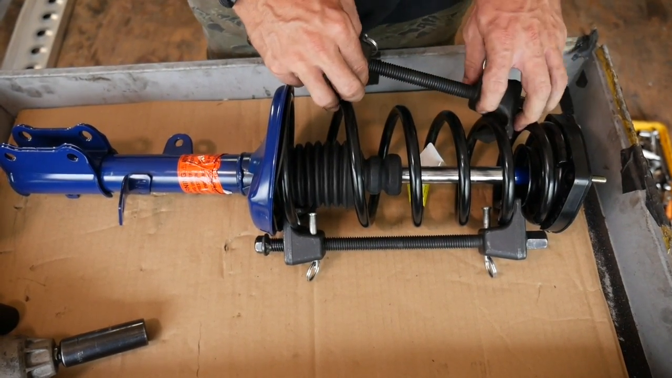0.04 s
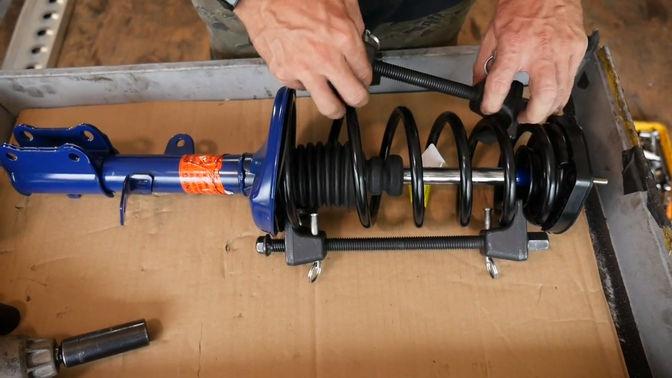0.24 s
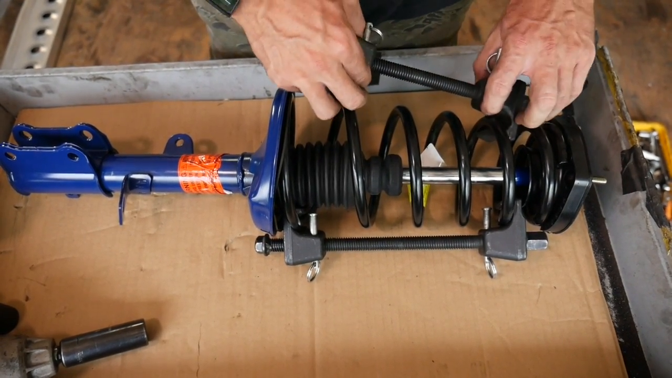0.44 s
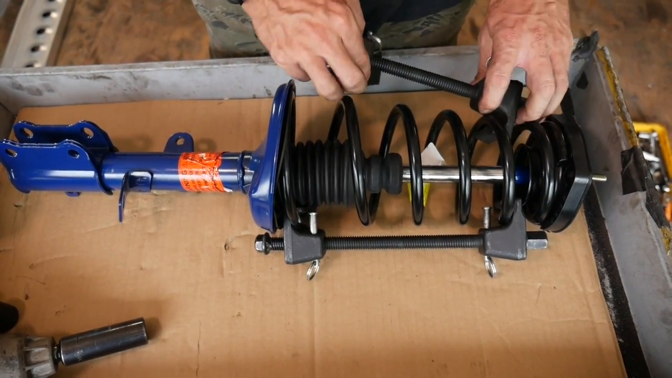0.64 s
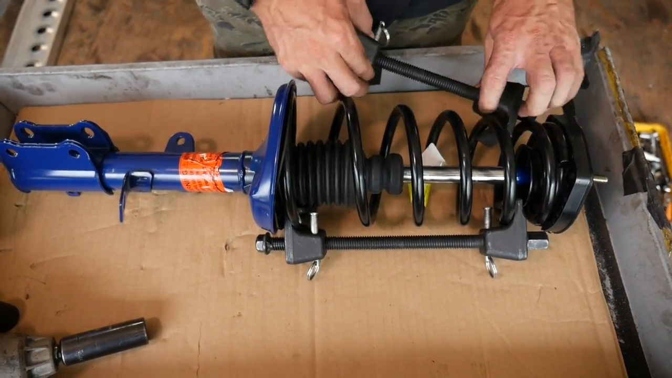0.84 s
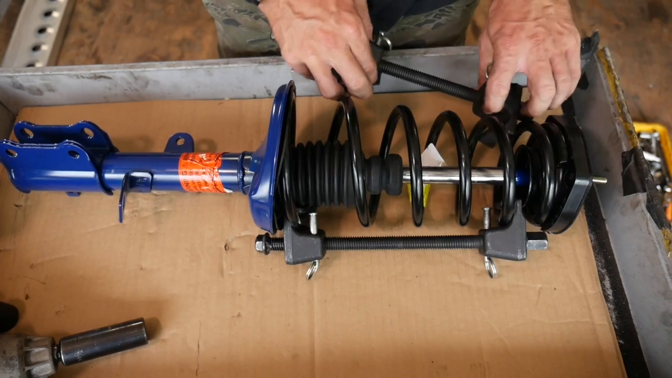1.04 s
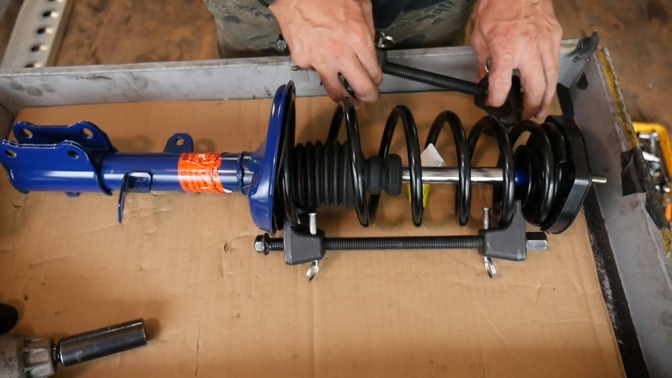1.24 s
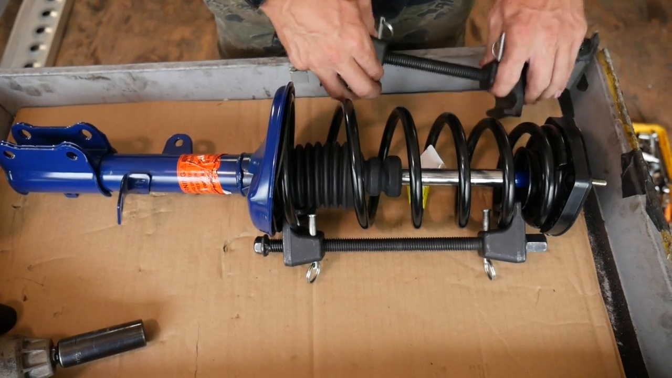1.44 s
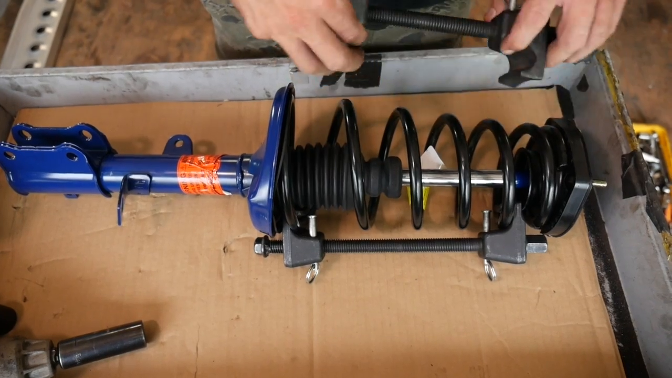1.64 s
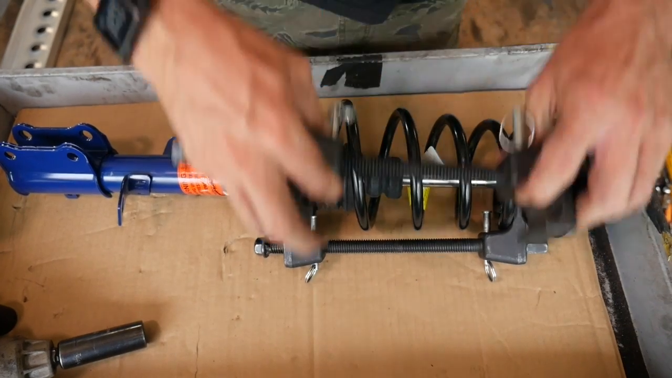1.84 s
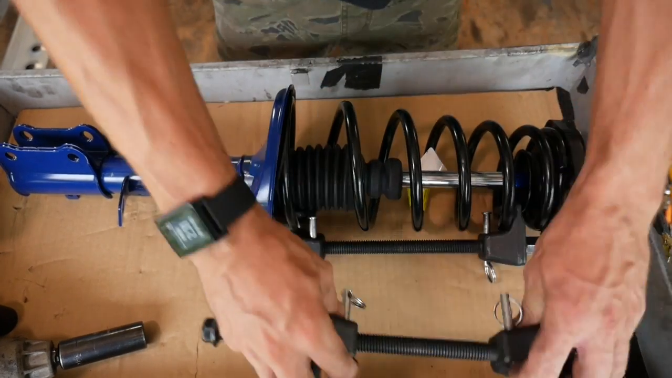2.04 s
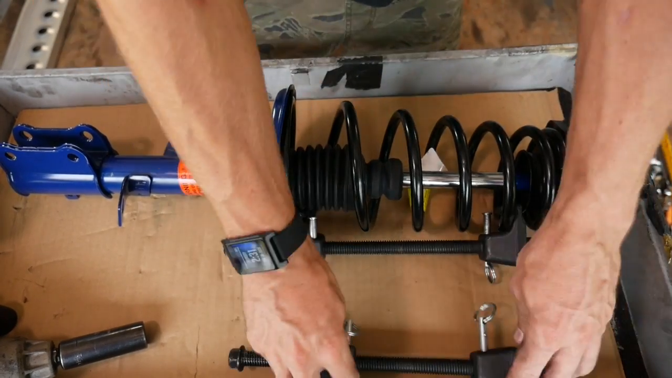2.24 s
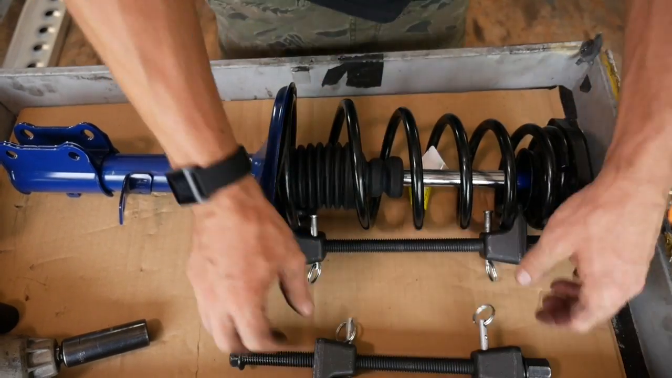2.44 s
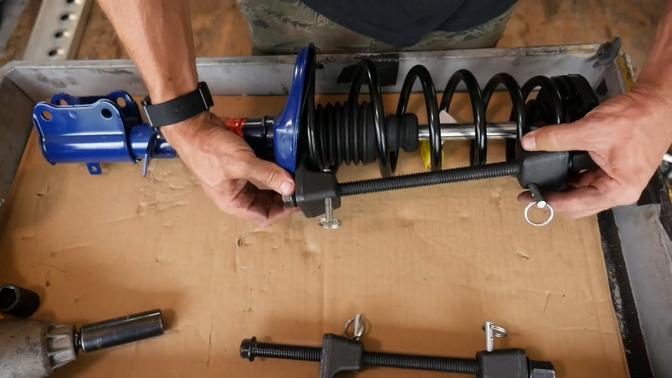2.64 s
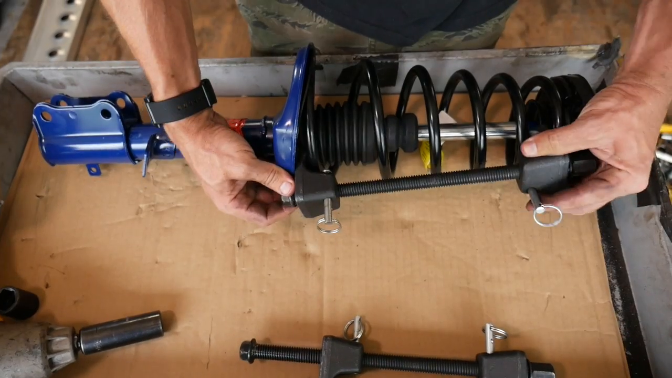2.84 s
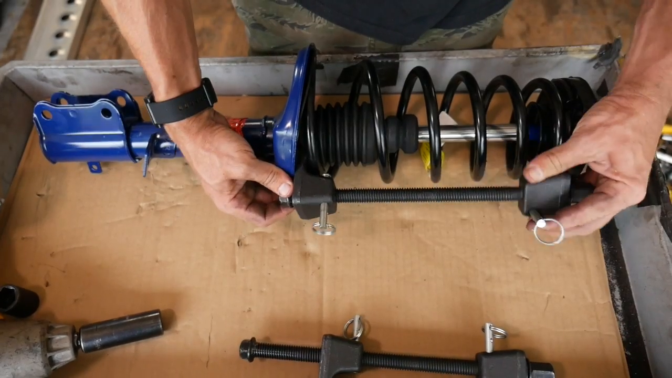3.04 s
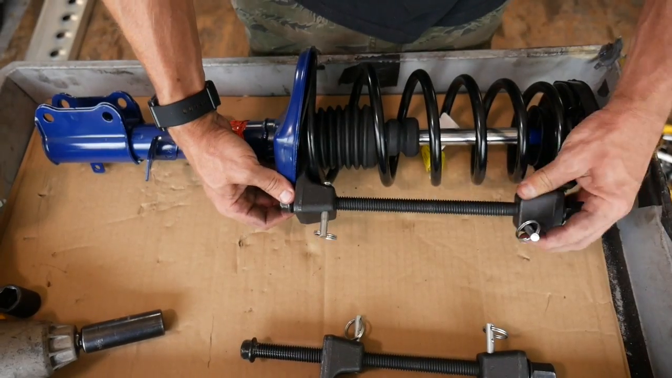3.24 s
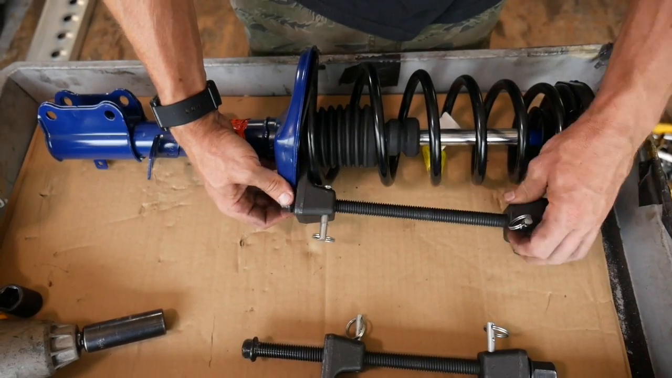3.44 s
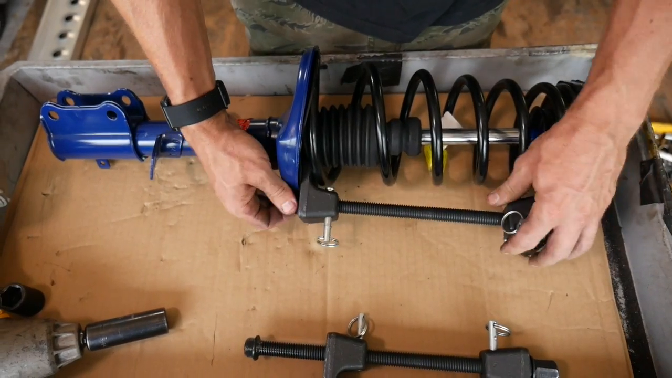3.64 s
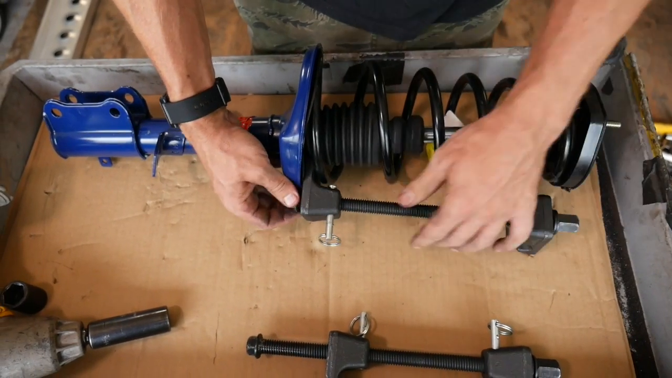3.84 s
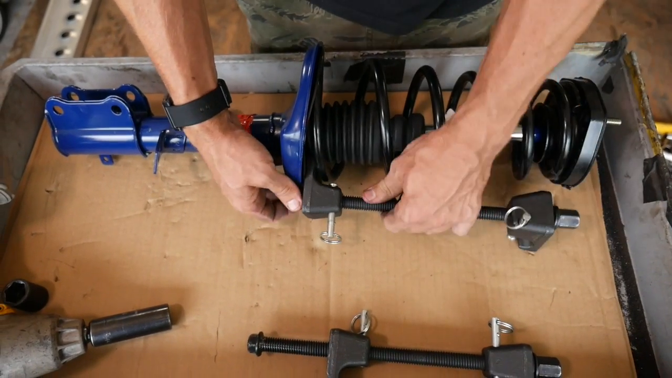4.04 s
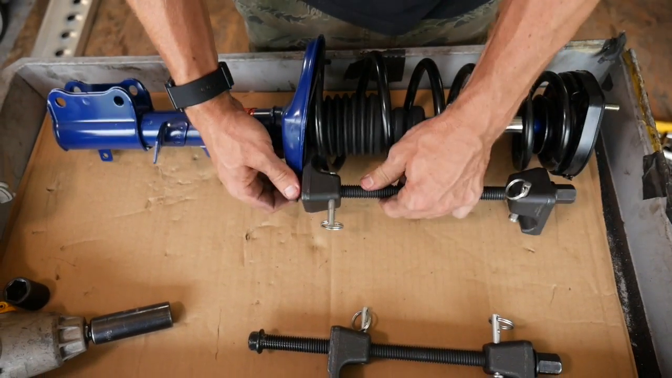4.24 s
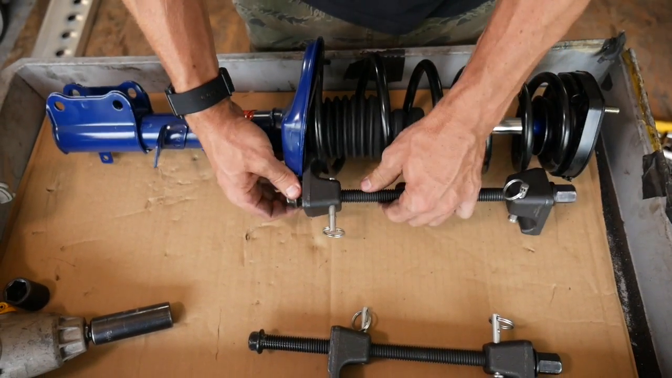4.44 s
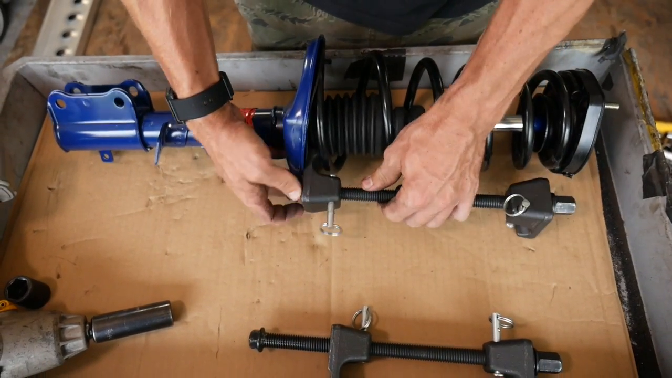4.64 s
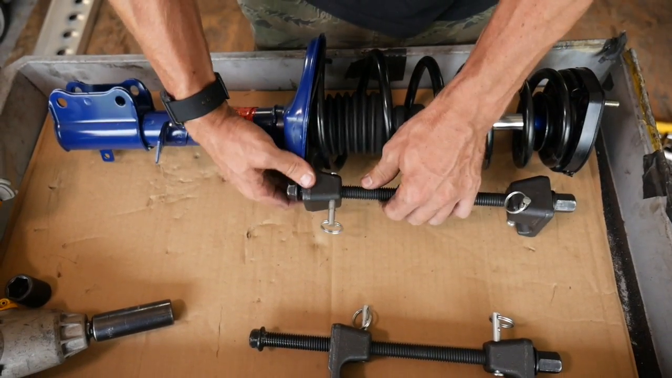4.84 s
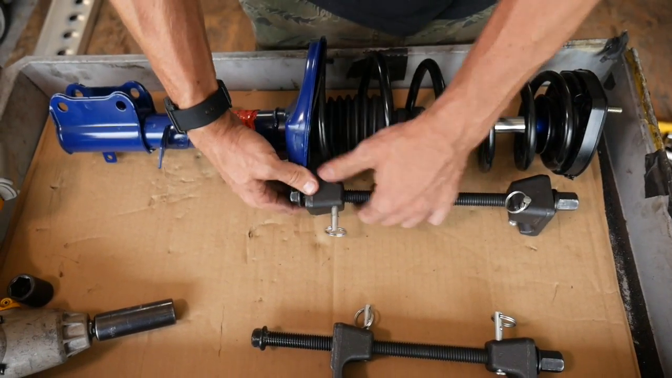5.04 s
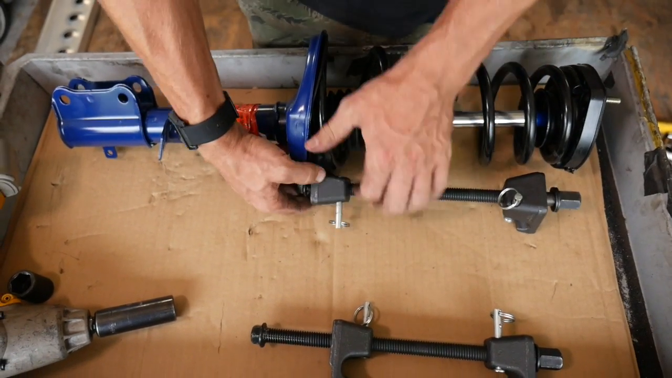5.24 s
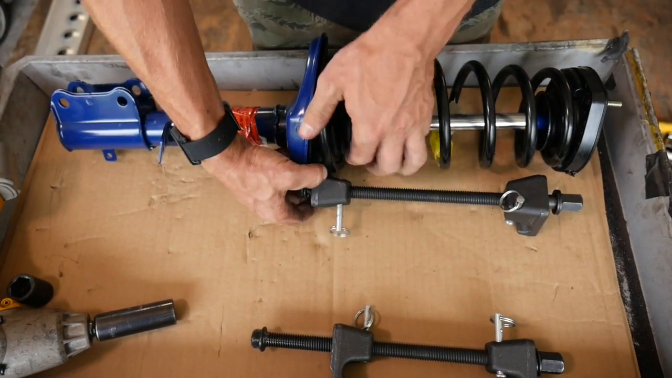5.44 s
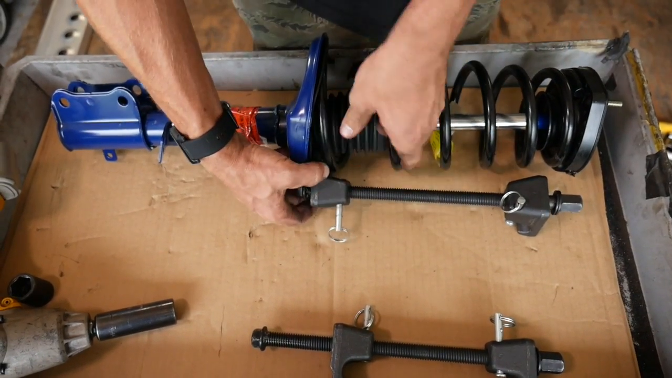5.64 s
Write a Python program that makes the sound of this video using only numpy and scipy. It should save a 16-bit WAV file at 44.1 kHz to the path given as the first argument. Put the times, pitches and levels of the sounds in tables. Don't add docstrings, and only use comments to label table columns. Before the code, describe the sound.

Over a faint motor hum, steel spring compressors tick, knock and jingle off a coil spring, with one heavy boom as steel drops onto cardboard.

```python
import sys
import numpy as np
from scipy import signal
from scipy.fft import rfft, irfft, next_fast_len
from scipy.io import wavfile

SR = 44100
rng = np.random.default_rng(int(sys.argv[2]) if len(sys.argv) > 2 else 0)


def put_to_file(sound):
    columns = np.atleast_2d(sound).T
    safe = np.clip(columns, -1, 1)
    whole_steps = np.round(safe * 32767)
    wavfile.write(sys.argv[1], SR, whole_steps.astype(np.int16))


def how_loud(loudness_db):
    steps = np.asarray(loudness_db, float) / 20
    return 10 ** steps


N = 251633
TIME_S = np.arange(N) / SR

# (frequency [Hz], level [dB per Hz])
AIR_SPECTRUM = [(20, 1.5), (60, -7), (270, -3), (600, -11.5), (1210, -18), (2510, -25.5), (14700, -31.5),
                (16500, -75.5)]
AIR_DB = -52.5
# (frequency [Hz], likeness [0-1])
AIR_LIKENESS = [(60, 0.8), (180, 0.78), (550, 0.73), (1650, 0.57), (4970, 0.17), (15000, 0.023)]
# (frequency [Hz], level [dB])
MOTOR_ORDERS = [(118, -71.5), (176, -66), (235, -59), (294, -62.5), (352, -65.5), (411, -69.5)]
# (time [s], level [dB])
CHIRPING = [
    (0, -77),
    (.55, -77),
    (.7, -90),
    (1.03, -89),
    (1.1, -56),
    (1.15, -68),
    (1.25, -72),
    (1.36, -68),
    (1.45, -87),
]
CHIRPING_HZ, CHIRPING_WIDTH_HZ = 3100, 480
# (time [s], level [dB])
TOOL_WHINE = [
    (0, -71.5),
    (.7, -68.5),
    (1.0, -90),
]
TOOL_WHINE_HZ = 1310
# (time [s], length [s], pitch [Hz], level [dB])
BIRD_NOTES = [
    (0.248, 0.036, 5770, -56.5),
    (0.296, 0.017, 5050, -55.5),
    (0.313, 0.021, 4650, -57),
    (0.334, 0.028, 4520, -54),
    (0.362, 0.0226, 4160, -54),
    (0.389, 0.031, 3870, -59),
]
# (delay [s], level [dB])
YARD_ECHOES = [(0, -2.5), (.013, -8), (0.031, -9), (.047, -11), (.07, -12), (.098, -17)]

# (time [s], peak level [dB], pitch [Hz])
FLOOR_PUSHES = [(0.298, -46, 154), (0.414, -47, 159), (0.583, -42.5, 144), (0.701, -45, 146),
                (0.772, -40.5, 147), (0.937, -38, 154), (1.155, -23.5, 153), (1.197, -35.5, 158.6),
                (1.419, -49, 178), (2.242, -16, 124), (2.3, -16, 156), (2.81, -43, 157.6),
                (3.116, -23, 171.3), (3.444, -44, 163), (3.561, -37.5, 154), (3.712, -46, 167.5),
                (4.108, -39, 153.6), (4.377, -27, 144), (4.57, -37.5, 161.4), (4.728, -34, 170),
                (5.15, -37.5, 142.5)]
# (time [s], peak level [dB], pitch [Hz])
WALL_SHAKES = [(1.224, -30.5, 200), (1.372, -34.5, 226), (2.232, -13.5, 215), (2.259, -8.5, 275),
               (2.289, -16, 238), (3.021, -30.5, 215), (3.602, -35, 422), (4.057, -38, 215),
               (4.252, -37.5, 256), (4.409, -23, 253), (4.439, -33, 310), (4.761, -28.5, 196),
               (4.874, -33, 236), (5.219, -20.5, 276), (5.238, -22, 242), (5.267, -22, 288),
               (5.324, -21.5, 215), (5.359, -25, 279.6), (5.406, -26, 205), (5.443, -21, 245),
               (5.591, -33.5, 234), (5.614, -36, 410), (5.679, -29, 248)]
FLOOR_T60_S, WALL_T60_S, HALVING_DB = 0.49, 0.17, 21
# (frequency [Hz], level [dB], t60 [s])
TRAY_MODES = [(93, -37, 0.14), (162.6, -17, 0.29), (249.4, -11, 0.29), (282, -20, 0.26),
              (402.8, -21.5, 0.17)]

# (time [s], pitch [Hz], level [dB], thinness [dB])
NUT_TICKS = [(0.6417, 7500, -40, 6), (1.1491, 7300, -22.5, 2), (1.2489, 9800, -37.5, 5.5),
             (2.0602, 10200, -38, 30), (2.2332, 7840, -20.5, -0.5), (2.4254, 9100, -33, 12),
             (3.1132, 7370, -18.5, 8), (3.119, 7300, -24.5, 8), (3.6074, 10600, -22, 3),
             (3.6113, 9000, -20.5, 15.5), (3.6193, 9090, -29, 23), (4.1139, 7820, -56, 0),
             (4.1567, 9505, -35.5, 4), (4.1900, 8200, -37.5, 7), (4.7504, 9800, -30.5, 10),
             (4.7582, 9600, -33.5, 10.5), (5.2105, 9500, -34, 18), (5.3945, 6350, -41, -1),
             (2.93, 9600, -50, 2), (3.051, 7200, -56, 0), (2.555, 8000, -53, 10), (5.4236, 9000, -46, 14)]
# (time [s], jaw pitch [Hz], level [dB], dullness [dB])
COIL_KNOCKS = [(0.9275, 1155, -50.5, 12), (1.1444, 1530, -24, 6), (1.3739, 1900, -35, -2),
               (2.23, 1520, -18.5, -1.5), (2.2935, 2070, -14.5, 18.5), (2.2975, 2246, -14.5, 17),
               (2.7072, 1820, -48, 21), (2.85, 1810, -47.5, 19), (2.9928, 1740, -48, 19),
               (3.449, 1680, -31.5, 18), (3.4785, 1531, -29, 12), (3.4948, 1530, -46, -5),
               (3.556, 1800, -38, 0), (3.6072, 1500, -33.5, 13), (2.7634, 1720, -60, 10),
               (2.8767, 1420, -52, 3), (3.0233, 1700, -49, 10), (1.36, 1500, -47, -2),
               (5.2325, 1900, -29, 16), (3.7072, 1530, -47, 10), (3.7175, 1600, -38.5, 21),
               (3.889, 1460, -42.5, 5), (4.3638, 1530, -30.5, 13), (4.3665, 1490, -25.5, 19),
               (4.372, 1500, -34, 20), (4.4437, 1560, -42, 17), (4.4842, 1750, -25.5, 9),
               (4.487, 1450, -33, 15), (4.5188, 1500, -44.5, 6), (4.5649, 1380, -40, 0),
               (4.603, 1480, -39, 12), (4.613, 1800, -48, 8), (5.1005, 1690, -46, 11),
               (5.1532, 1710, -46, 18), (5.3503, 1090, -43.5, 21), (5.3688, 1390, -45, 2),
               (5.446, 1460, -40, 0)]
# (time [s], pitch [Hz], level [dB], thinness [dB])
POINT_TICKS = [(1.0544, 12100, -29.5, 12), (1.8645, 8730, -33, 5), (2.0295, 9840, -37, 17),
               (2.7174, 9170, -46, -2.5), (3.2306, 10600, -27.5, 11), (3.3086, 7260, -45, 4.5),
               (3.5228, 12100, -35.5, 8), (1.172, 14000, -48, 25), (1.193, 14500, -43, 20),
               (0.897, 13000, -55, 10), (5.37, 9500, -52, 5)]
# (time [s], jaw pitch [Hz], level [dB], lightness [dB])
STEEL_CLACKS = [(1.1996, 2960, -44.5, -4), (1.222, 4140, -41, -5), (2.1932, 4970, -44.5, -5),
                (2.221, 3140, -39, -3), (2.2449, 5020, -35, -7), (2.2365, 3870, -27, 2),
                (2.29, 4930, -16.5, 20), (2.301, 2360, -47, 12), (2.3691, 5000, -39.5, 22),
                (2.4196, 4170, -47, 19), (2.9152, 3740, -47, 18.5), (3.0239, 3672, -44.5, -6),
                (3.0903, 2560, -29.5, -1.5), (3.1015, 2700, -35, -7), (3.0965, 2500, -34, 8),
                (3.1135, 2590, -23, -1), (3.1165, 2610, -25.5, 1.5), (3.1195, 2600, -23, 5),
                (4.4135, 3400, -46, 8), (4.382, 5250, -43, 5), (4.498, 3100, -49, 4),
                (4.4805, 2460, -42, 0), (3.1305, 4370, -34, -1), (3.7064, 2430, -44, 9),
                (4.1005, 5140, -28.5, 8.5), (4.1472, 4380, -42, 4), (5.1588, 3500, -44, 3),
                (3.454, 4320, -35, 15), (4.1014, 7200, -28, 20), (4.1087, 5130, -28.5, 5.5),
                (4.7121, 3100, -35.5, -3.5), (5.1658, 3100, -42, -5), (5.2138, 6470, -26.5, 4),
                (5.2321, 3870, -20.5, 6.5), (5.2459, 4900, -24, 9), (5.2762, 7340, -39, -4),
                (5.604, 6000, -42.5, 14), (5.6985, 2120, -37, 21)]
# (low edge [Hz], high edge [Hz], t60 [s], make-up [dB])
TOUCH_REGISTERS = [(730, 2700, 0.031, 9), (2124, 5730, 0.012, 12), (6650, 10740, 0.0069, 10.5),
                   (9600, 15800, 0.0044, 18)]
# (colour per register [dB], loss per register [dB per dB of the last event column], own pitch level [dB])
COIL_KNOCK_COLOUR = (-3, -3, -5, -20), (0, 1.2, 1.25, 1.1), 4
STEEL_CLACK_COLOUR = (0, 0, -9, -24), (1, 0, 0, 0), 3
NUT_TICK_COLOUR = (0, 0.1, 0, -6.5), (1.1, 1, 0.037, 4), 2
POINT_TICK_COLOUR = (0, 0.45, 0, 3), (1.3, 1, 0.023, 1), -5

# (time [s], peak level [dB], pitch [Hz], t60 [s])
LINING_KNOCKS = [(1.146, -28.5, 778, 0.079), (1.374, -30, 436, 0.043), (2.230, -15, 746, 0.035),
                 (2.2902, -5, 237, 0.045), (2.2944, 1.5, 235, 0.037), (2.301, -19, 253, 0.33),
                 (2.232, -21.5, 450, 0.052), (2.234, -17, 104, 0.15), (2.253, -19.5, 385, .07),
                 (2.288, -18.5, 417, 0.055), (2.338, -24.5, 165.7, 0.15), (2.345, -28, 255, .15),
                 (2.31, -26, 380, .12), (2.305, -24, 120, .1), (2.248, -12, 190, .03),
                 (4.372, -33, 915, 0.11), (4.483, -30, 594, 0.04), (4.366, -32, 640, .06),
                 (5.265, -24.5, 426, 0.07), (5.324, -21, 385.4, 0.068), (5.446, -48, 436, 0.21),
                 (5.616, -32.5, 730, 0.051)]

# (start [s], end [s], start level [dB], end level [dB], brightness [dB])
JAW_SLIDES = [(1.23, 1.36, -66, -66, 1), (1.385, 1.465, -55.5, -63, -6), (1.157, 1.34, -54.5, -79, -7),
              (2.24, 2.33, -40, -39, 0), (2.286, 2.42, -43, -52, -1.5), (2.587, 2.738, -63, -52, 1),
              (2.82, 2.955, -56.5, -69, -2.5), (2.986, 3.12, -52.5, -57.5, -4),
              (3.088, 3.146, -37.5, -54, -8), (3.54, 3.67, -62, -60, -5), (3.61, 3.44, -31, -76, -4),
              (4.38, 4.48, -54, -60, -7.5), (4.495, 4.619, -68, -48.5, -1.5), (4.68, 4.8, -56.5, -53.5, -2),
              (5.238, 5.3, -30.5, -56, -2.5), (5.305, 5.6, -54.5, -84, -1)]
# (frequency [Hz], width [Hz], level [dB])
SLIDE_BANDS = [(1530, 960, 7), (2000, 190, -12), (3910, 1700, 3), (7200, 2300, -7), (11200, 8500, -5)]
# (start [s], end [s], start level [dB], end level [dB], brightness [dB])
COIL_SCRAPES = [
    (4.108, 4.13, -38, -47.5, 0),
    (4.138, 4.2, -48.5, -44.5, 0),
    (4.215, 4.235, -41.5, -48, 0),
    (4.24, 4.258, -46, -50.5, 0),
]
# (frequency [Hz], width [Hz], level [dB])
SCRAPE_BANDS = [(1500, 680, 0), (1950, 450, 3), (4180, 850, 5.5), (5450, 7300, 0), (10500, 4000, -13)]
# (start [s], end [s], start level [dB], end level [dB], brightness [dB])
CARDBOARD_RUBS = [
    (3.453, 3.476, -36.5, -42, 0.55),
    (3.482, 3.505, -43, -60, 0),
    (3.698, 3.738, -44.5, -53.5, 0.53),
    (5.14, 5.208, -58, -42, 1.05),
]
# (frequency [Hz], width [Hz], level [dB])
RUB_BANDS = [(1500, 550, 2.5), (2600, 1600, -10), (4050, 650, 5.5), (6700, 3900, 0), (10600, 4100, -6)]

# (time [s], peak level [dB],
# pitch [Hz], t60 [s])
PIN_JINGLES = [(1.867, -36.5, 9090, 0.032), (2.060, -39.5, 9400, 0.024), (2.162, -60, 4950, 0.1),
               (2.243, -40, 4950, 0.08), (2.263, -37, 2950, 0.035), (2.298, -58, 2500, 0.64),
               (2.321, -47, 9300, 0.04), (2.7, -39.5, 9500, 0.05), (2.440, -60.5, 8900, 0.55),
               (2.981, -58, 9500, 0.12), (3.101, -45, 9500, 0.02), (3.118, -48, 2636, 0.2),
               (3.139, -41, 10000, 0.03), (3.232, -46, 5230, 0.044), (3.548, -52, 10550, 0.08),
               (3.549, -57, 12050, 0.06), (3.571, -60, 9080, 0.2), (3.610, -40, 10580, 0.09),
               (3.611, -47, 12050, 0.08), (3.612, -34, 9085, 0.12), (3.661, -56, 10580, 0.1),
               (3.735, -58, 8700, 0.054), (4.115, -42, 7350, 0.03), (5.171, -55, 8950, 0.06),
               (5.255, -44, 4930, 0.04), (5.261, -44, 9800, 0.03), (5.276, -45, 9100, 0.025),
               (5.402, -63, 8500, 0.23), (5.422, -62, 8600, 0.22)]
# (time [s], level [dB], upper modes against lower [dB])
ROD_HITS = [(2.242, -46, -13), (2.257, -43, -8), (2.262, -46, -8), (2.278, -53.5, 4), (2.2905, -37.5, 1),
            (3.608, -59.5, -2), (4.101, -47, -5), (4.367, -64, 6), (4.484, -70.5, 6), (5.2137, -40.5, -9),
            (5.223, -48.5, -1.5), (5.242, -35.5, -10), (5.247, -47, 2), (5.254, -45, -12),
            (5.275, -57, -16)]
# (frequency [Hz], level [dB], t60 [s])
ROD_MODES = [(4930, -8, 0.037), (7290, -1, 0.034), (9090, -11.5, 0.037), (9900, -8, 0.037),
             (10600, -8, 0.077), (12000, -26.5, 0.058), (12670, -14.5, 0.065)]
ROD_UPPER_HZ = 8000

# (frequency [Hz], t60 [s])
GARAGE_DECAY = [(150, 0.38), (1000, 0.3), (4000, 0.31), (12000, 0.25)]
LEFT_LAG_S = 2.1e-5
RIM_S, RIM_DB = .004, -2.5
# (time [s], gain [dB])
AUTO_GAIN = [
    (0, 0),
    (2.291, -1),
    (2.33, -1),
    (2.576, -7),
    (2.591, 1),
    (5.71, 0),
]


def at_hz(points, hz):
    points_hz, values = np.transpose(points)
    return np.interp(np.log(hz), np.log(points_hz), values)


def level_curve(rows):
    s, db = np.transpose(rows)
    return np.interp(TIME_S, s, db, -120, -120)


def rms_one(x):
    return x / np.sqrt(np.mean(x ** 2) + 1e-20)


def band(x, low_hz, high_hz):
    sos = signal.butter(2, [low_hz, min(high_hz, .48 * SR)], "band", fs=SR, output="sos")
    return signal.sosfilt(sos, x)


def ring(x, hz, t60):
    r = how_loud(-60 / (max(t60, .002) * SR))
    w = 2 * np.pi * hz / SR
    return signal.lfilter([0, np.sin(w)], [1, -2 * r * np.cos(w), r * r], x + 1e-18)


def sine(hz, t):
    return np.sin(2 * np.pi * hz * t)


def drift(rate_hz):
    knots = rng.standard_normal(int(N / SR * rate_hz) + 2)
    return np.interp(TIME_S * rate_hz, np.arange(len(knots)), knots)


def add(out, s, sound):
    i = round(s * SR)
    out[..., i:i + sound.shape[-1]] += sound[..., :N - i]


def air(patchy_db=3.5, smooth_hz=500):
    out = np.zeros((2, N))
    edges = 20 * 2 ** np.arange(0, 10.1, .5)
    white = rng.standard_normal((2, 2, N))
    for k, (low, high) in enumerate(zip(edges, edges[1:])):
        mid, side = band(white[k % 2], low, high)
        hz = np.sqrt(low * high)
        alike = np.clip(at_hz(AIR_LIKENESS, hz), -1, 1)
        flicker_db = patchy_db * drift(24) * min(1, (smooth_hz / hz) ** .5)
        stereo = np.sqrt(1 + alike) * mid + np.sqrt(1 - alike) * side * [[1], [-1]]
        out += how_loud(at_hz(AIR_SPECTRUM, hz) + flicker_db) * stereo
    return how_loud(AIR_DB) * rms_one(out)


def motor():
    return sum(how_loud(db) * rms_one(ring(rng.standard_normal(N), hz, 0.5)) for hz, db in MOTOR_ORDERS)


def far_chirping():
    low_hz = CHIRPING_HZ - CHIRPING_WIDTH_HZ / 2
    chirps = rms_one(band(rng.standard_normal(N), low_hz, low_hz + CHIRPING_WIDTH_HZ))
    return how_loud(level_curve(CHIRPING) + 3.1 * drift(30.4)) * chirps


def far_tool():
    whine = rms_one(band(rng.standard_normal(N), TOOL_WHINE_HZ - 45, TOOL_WHINE_HZ + 45))
    return how_loud(level_curve(TOOL_WHINE)) * whine


def bird(flutter_db=4.5, sag=0.056):
    call = np.zeros(N)
    for s, length_s, hz, db in BIRD_NOTES:
        along = np.linspace(0, 1, round(length_s * SR))
        phase = 2 * np.pi * np.cumsum(hz * (1 + sag * (.5 - along))) / SR
        swell = np.sqrt(np.sin(np.pi * along) + 1e-9)
        add(call, s, how_loud(db + 2) * swell * np.sin(phase))
    call *= how_loud(flutter_db * drift(400))
    return sum(how_loud(db) * np.roll(call, round(s * SR)) for s, db in YARD_ECHOES)


def tray(swell_s=0.0034):
    out, t = np.zeros(N), np.arange(12000) / SR
    puffs = rms_one(band(rng.standard_normal(48000), 150, 441)).reshape(4, -1)
    thuds = [(*row, FLOOR_T60_S) for row in FLOOR_PUSHES] + [(*row, WALL_T60_S) for row in WALL_SHAKES]
    for s, peak_db, hz, faint_t60 in thuds:
        t60 = faint_t60 * 2 ** (-(peak_db + 47.0) / HALVING_DB)
        sound = how_loud(2.5 - 60 * t / max(0.55 * t60, .02)) * sine(hz, t)
        for mode_hz, rel_db, mode_t60 in TRAY_MODES:
            sound += rng.standard_normal() * how_loud(rel_db - 60 * t / mode_t60) * sine(mode_hz, t)
        sound += how_loud(-12.5 - 60 * t / 0.16) * puffs[rng.integers(4)]
        add(out, s, how_loud(peak_db) * sound * (1 - np.exp(-t / swell_s)))
    return out


def contacts(jaw_t60=.03, swell_s=.0004, damping=.55):
    jaws, bursts, t = np.zeros(N), np.zeros((4, N)), np.arange(3000) / SR
    low_hz, high_hz, t60, makeup_db = np.transpose(TOUCH_REGISTERS)
    swell = 1 - np.exp(-t / swell_s)
    dying = how_loud(-60 * t / t60[:, None]) * swell
    grit = rng.standard_normal(N + 3000)
    kinds = ((NUT_TICKS, NUT_TICK_COLOUR), (COIL_KNOCKS, COIL_KNOCK_COLOUR),
             (POINT_TICKS, POINT_TICK_COLOUR), (STEEL_CLACKS, STEEL_CLACK_COLOUR))
    for rows, (colour_db, loss, jaw_db) in kinds:
        for s, hz, db, lean_db in rows:
            jaw_decay_db = 60 * t / jaw_t60 * (hz / 1500) ** damping
            add(jaws, s, how_loud(db + jaw_db - jaw_decay_db) * sine(hz, t) * swell)
            register_db = db + makeup_db + colour_db - lean_db * np.array(loss)
            noise = grit[round(s * SR):][:len(t)]
            add(bursts, s, how_loud(register_db)[:, None] * dying * noise)
    gritty = sum(band(b + 1e-18, low, high) for b, low, high in zip(bursts, low_hz, high_hz))
    return jaws, gritty


def lining(swell_s=0.0034):
    out, t = np.zeros(N), np.arange(12000) / SR
    for s, peak_db, hz, t60 in LINING_KNOCKS:
        add(out, s, how_loud(peak_db - 60 * t / max(t60, .01)) * sine(hz, t) * (1 - np.exp(-t / swell_s)))
    return out


def slides(per_s=4000, spread_db=3.5, edge_s=0.0088):
    grain_db = spread_db * np.minimum(rng.exponential(1, N), 3.5)
    grains = (rng.random(N) < per_s / SR) * how_loud(grain_db) * rng.choice([-1, 1], N)
    out, body = np.zeros(N), rms_one(band(grains, 227, 1500))
    kinds = ((JAW_SLIDES, SLIDE_BANDS, 3.5), (CARDBOARD_RUBS, RUB_BANDS, -3), (COIL_SCRAPES, SCRAPE_BANDS, -6))
    for rows, resonances, body_db in kinds:
        peaks = [how_loud(db) * rms_one(band(grains, hz - width / 2, hz + width / 2))
                 for hz, width, db in resonances]
        dull = rms_one(peaks[0] - peaks[1] + how_loud(body_db) * body)
        bright = rms_one(peaks[2] - peaks[3] + peaks[4])
        for start_s, end_s, start_db, end_db, bright_db in rows:
            times = [start_s - edge_s, start_s, end_s, end_s + edge_s]
            levels_db = [start_db - 36, start_db, end_db, end_db - 20.0]
            on = slice(int(times[0] * SR), int(times[-1] * SR))
            level = how_loud(np.interp(TIME_S[on], times, levels_db) - 4.0)
            out[on] += level * (how_loud(-bright_db / 2) * dull[on] + how_loud(bright_db / 2) * bright[on])
    return out * how_loud(2.9 * drift(70))


def pins():
    out, t = np.zeros(N), np.arange(12000) / SR
    for s, peak_db, hz, t60 in PIN_JINGLES:
        pair = sine(hz, t) + 0.59 * sine(hz + 230, t) * how_loud(-60 * t / 0.074)
        add(out, s, how_loud(peak_db + 4.5) * pair * how_loud(-60 * t / max(t60, .01)))
    return out


def rod():
    (s, db, upper_db), out = np.transpose(ROD_HITS), np.zeros(N)
    for hz, rel_db, t60 in ROD_MODES:
        clicks = np.zeros(N)
        clicks[(s * SR).astype(int)] = how_loud(db + upper_db * (hz > ROD_UPPER_HZ) + rel_db + 18.5)
        out += ring(clicks, hz, t60) * how_loud(5 * drift(120))
    return out


def ports(x, treble_hz=4500):
    size = next_fast_len(N + 4096)
    hz = np.fft.rfftfreq(size, 1 / SR)
    treble = hz ** 2 / (hz ** 2 + treble_hz ** 2)
    delays = rng.uniform(0.0832, 1, (2, 4, 1)) * RIM_S
    signs = rng.choice([-1, 1], (2, 4, 1))
    rim = how_loud(RIM_DB) * treble * np.sum(signs * np.exp(-2j * np.pi * hz * delays), axis=1) / 2
    lag = np.exp(-2j * np.pi * hz * [[LEFT_LAG_S], [0]])
    direct = how_loud([[-.6], [.6]] + treble * [[-1.8], [1.8]]) * lag
    return irfft(rfft(x, size) * (direct + rim), size)[:, :N]


def garage(x, first_s=0.0025):
    t = np.arange(16000) / SR
    white = rng.standard_normal((2, len(t))) * (t > first_s)
    tail = 0
    for low in 80 * 2. ** np.arange(8):
        tail = tail + band(white, low, 2 * low) * how_loud(-60 * t / at_hz(GARAGE_DECAY, 1.96 * low))
    tail = tail / np.sqrt(np.sum(tail ** 2) / 2)
    return signal.fftconvolve(x[None], tail, axes=1)[:, :N]


def scene():
    outside = bird() + far_chirping() + far_tool()
    low = tray() + lining()
    jaws, grit = contacts()
    steel = grit + slides() + pins() + rod()
    sent = how_loud(-13.0) * steel + how_loud(-20.5) * jaws + how_loud(-19.5) * low + how_loud(2.0) * outside
    return ports(jaws + steel + low) + outside + garage(sent) + air() + motor()


def low_pass(x):
    return signal.sosfilt(signal.butter(12, 16800, fs=SR, output="sos"), x)


def record(dry):
    s, gain_db = np.transpose(AUTO_GAIN)
    levelled = dry * how_loud(np.interp(TIME_S, s, gain_db))
    top_cut = signal.cheby2(10, 50, 16950, fs=SR, output="sos")
    mix = signal.sosfilt(top_cut, levelled)
    return low_pass(mix)


dry = scene()
out = record(dry)
put_to_file(out)
```